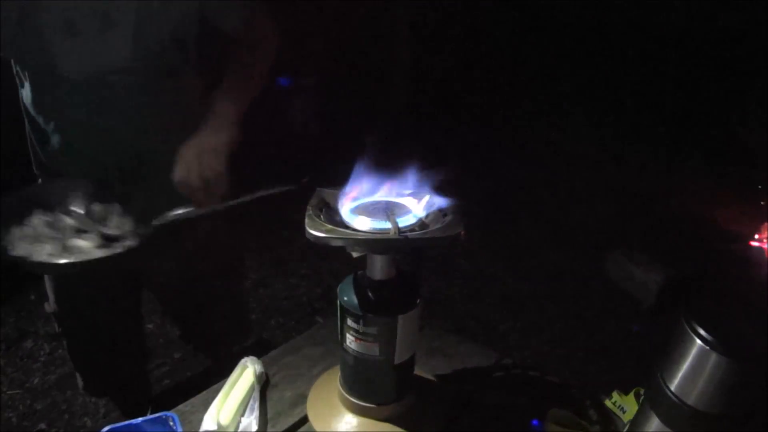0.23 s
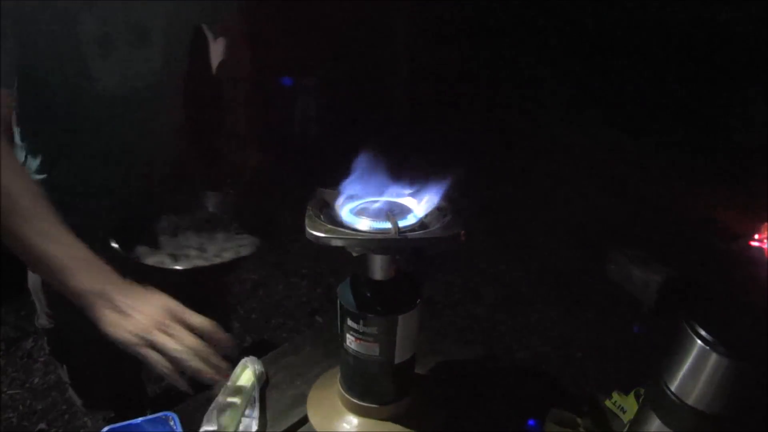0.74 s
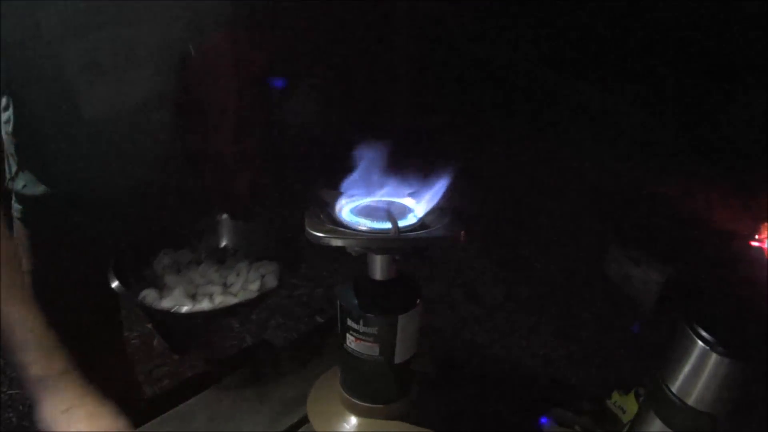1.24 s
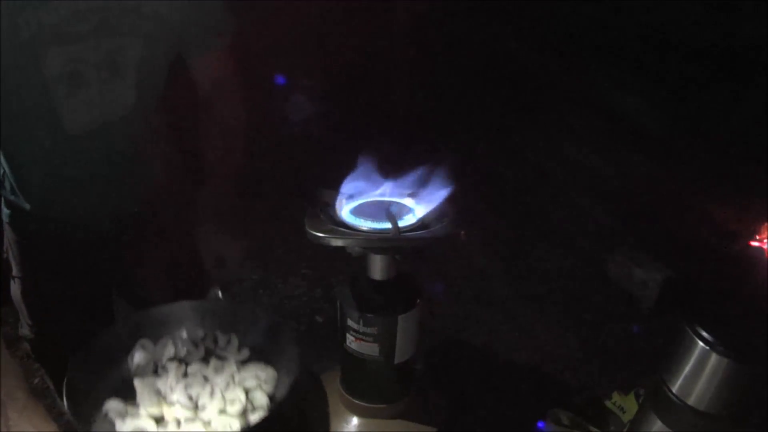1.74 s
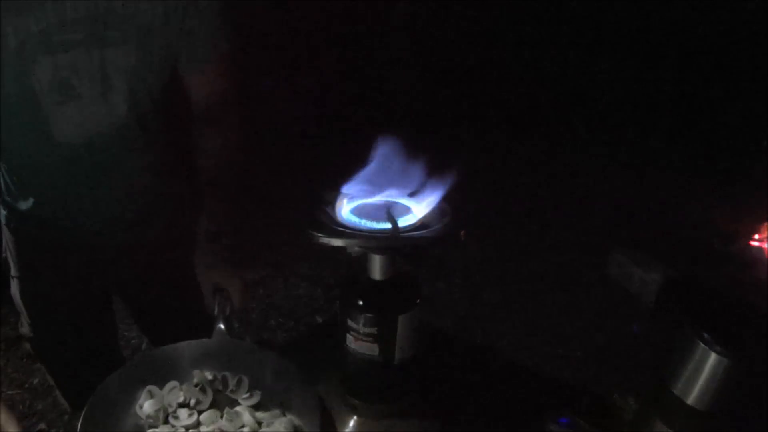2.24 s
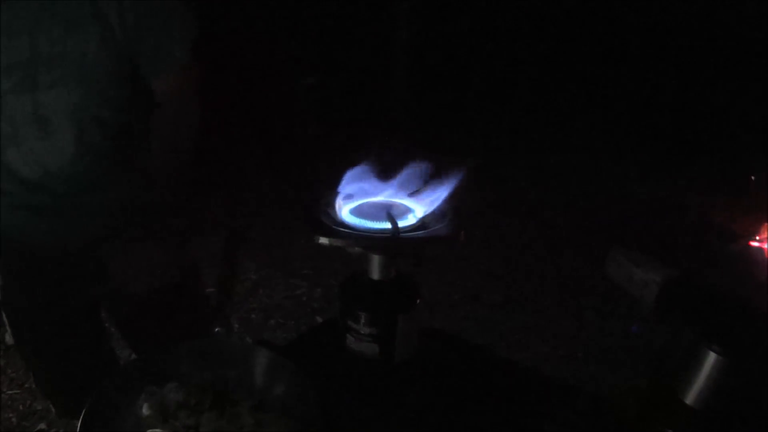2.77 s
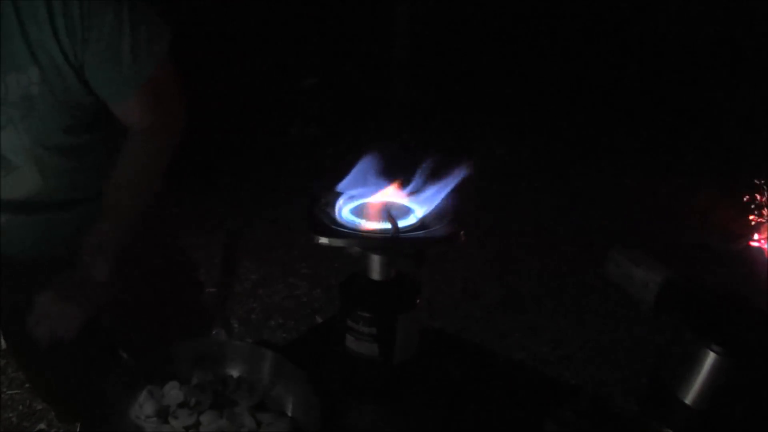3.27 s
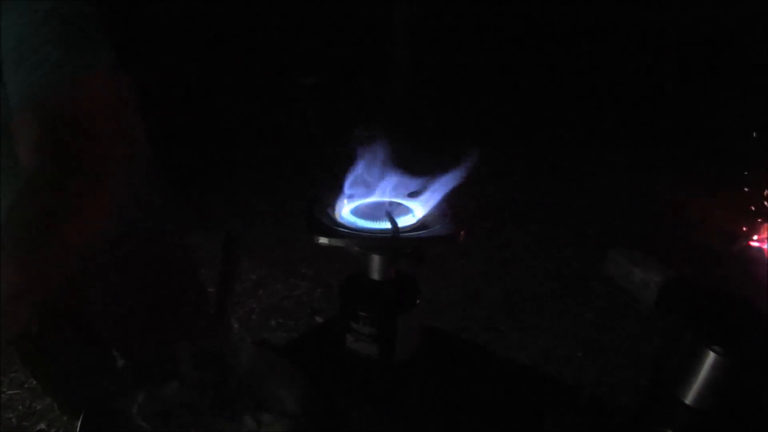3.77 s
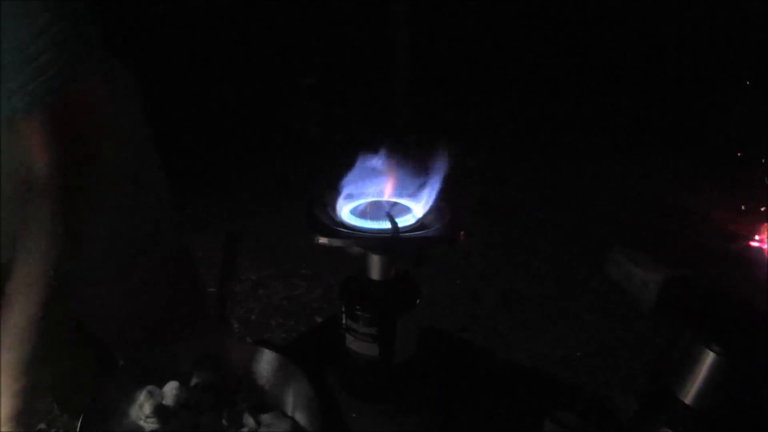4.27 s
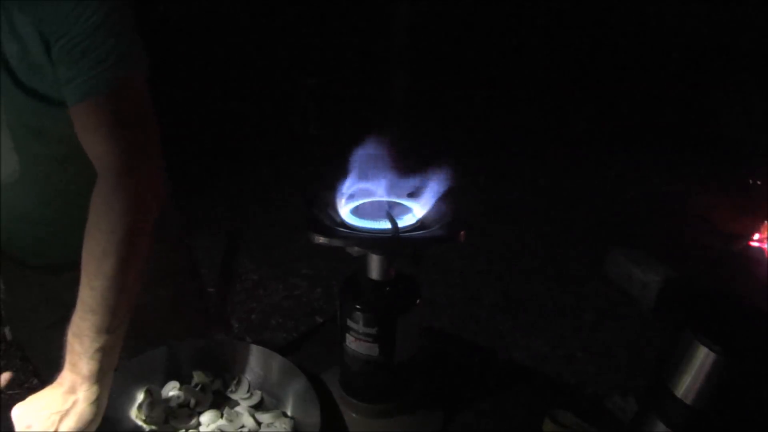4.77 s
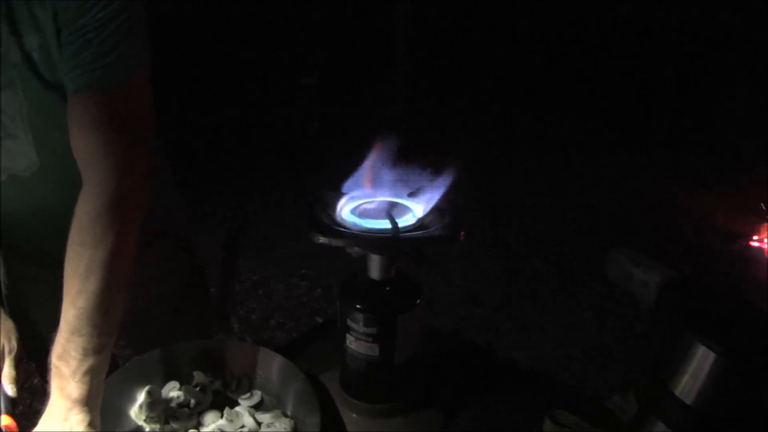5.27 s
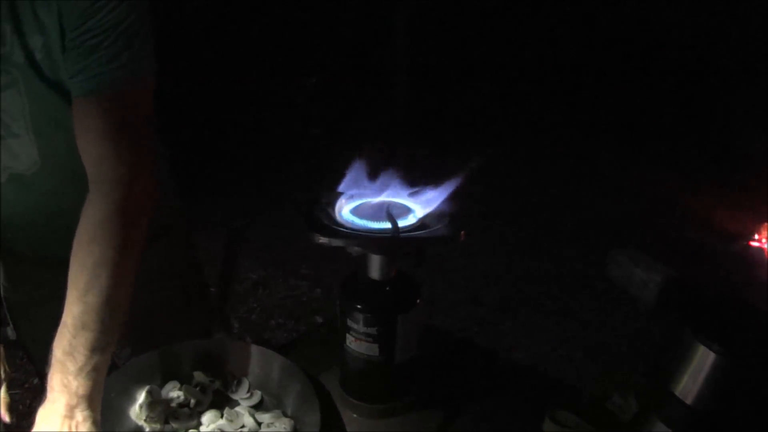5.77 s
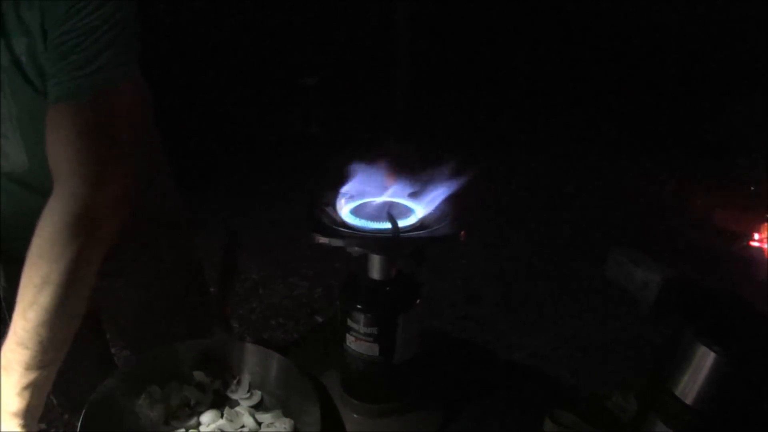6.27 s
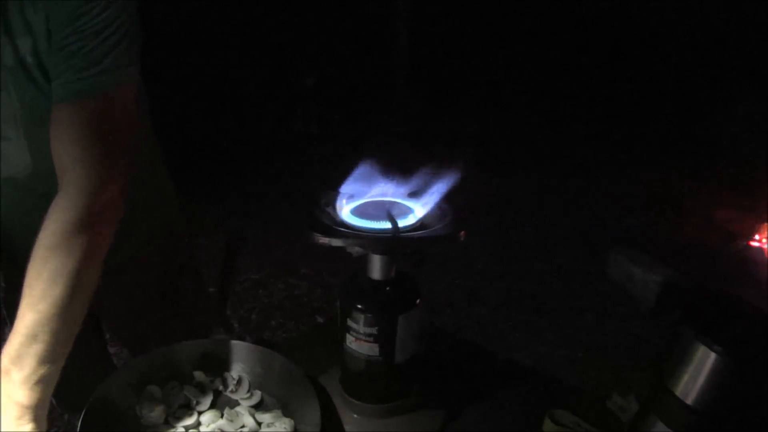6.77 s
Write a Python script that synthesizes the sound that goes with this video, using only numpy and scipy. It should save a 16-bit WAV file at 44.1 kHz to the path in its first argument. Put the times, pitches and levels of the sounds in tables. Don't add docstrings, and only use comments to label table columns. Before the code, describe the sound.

Constant bright burner hiss with low flame flutter outdoors, broken by crinkling wrapper, pan set-down clatter, utensil taps and sharp fire pops.

```python
import sys
import numpy as np
from scipy import signal
from scipy.fft import rfft, irfft
from scipy.io import wavfile
from scipy.ndimage import uniform_filter1d, minimum_filter1d

SR = 44100
rng = np.random.default_rng(int(sys.argv[2]) if len(sys.argv) > 2 else 0)


def unload_wav(signal):
    wavfile.write(
        sys.argv[1],
        SR,
        np.round(np.clip(np.atleast_2d(signal).T, -1, 1) * 32767).astype(np.int16),
    )


def attenuation_scalar(level_db):
    decades = np.asarray(level_db, float) / 20
    return 10 ** decades


N = 309141

# frequency in Hz, likeness from 0 to 1.
STOVE_LIKENESS = [(60, 0.8), (110, 1), (190, 0.87), (340, 0.85), (620, 0.63), (1110, 0.62), (1980, 0.78),
                  (3550, 0.95), (6350, 0.95), (11400, 0.84)]
# frequency in Hz, left minus right in dB.
STOVE_TILT = [(60, 1), (110, 1.5), (190, -0.5), (340, -0.5), (620, -3), (1110, -1.5), (1980, -1),
              (3550, -1.0), (6350, -1.5), (11400, -0.5)]
# start in seconds, peak in dB, centre in Hz, ring t60 in seconds,
# left minus right in dB.
EMBER_SNAPS = [
    (0.7574, -21, 7750, 0.006, -11),
    (0.9482, -11, 10600, 0.0055, 3),
    (0.9622, -19, 6350, 0.006, -1.0),
    (0.9941, -9, 6760, 0.0066, -0.5),
    (1.5994, -19, 7820, 0.006, -1.5),
    (1.9344, -24, 7850, 0.006, -1.5),
    (2.2383, -15, 5600, 0.0073, -0.5),
    (2.7816, -10, 9300, 0.0037, -13),
    (3.0994, -22, 7720, 0.006, 4),
    (4.141, -12, 6720, 0.0076, 5),
]
# start in seconds, peak in dB, body in Hz,
# ring t60 in seconds, left minus right in dB.
EMBER_POPS = [
    (0.758, -17, 1980, 0.016, -10),
    (0.94, -18.5, 437, 0.032, -8),
    (0.942, -16, 1110, .008, -1),
    (2.782, -4.5, 1040, 0.0074, -10),
    (2.785, -15, 1490, .015, -9),
    (4.141, -12, 1700, .008, 2),
    (6.1564, -3.5, 1030, 0.0066, -7),
    (6.1589, -13, 1190, 0.015, -2),
]
# frequency in Hz, level in dB per Hz.
WRAPPER_COLOUR = [(1470, -43), (2500, -9), (3130, 8), (4770, -13.5), (5240, -7), (6950, -7.5),
                  (10700, -14.5), (11200, -10), (14600, -44), (22000, -120)]
# peak time in seconds, peak in dB, swell in seconds,
# release in dB per second, body level in dB.
WRAPPER_GRIPS = [(0.905, -43, .015, 60, -6), (0.95, -28, .012, 95, -12), (1.056, -36, .02, 300, -6),
                 (1.148, -34.5, .04, 90, -12), (1.268, -35, .025, 400, -8), (1.296, -27.5, .012, 150, -13),
                 (1.4, -43, .03, 120, -6), (3.103, -31, .012, 800, -3), (3.8, -42, .06, 200, -4),
                 (5.218, -32, .045, 120, -4), (5.268, -34, .04, 400, -9)]
# frequency in Hz, level in dB, t60 in seconds.
TABLE_MODES = [(80.5, -1.5, 0.18), (116, -9, .15), (169, 1, 0.13), (250, -0.5, 0.15), (314, -0.5, 0.056),
               (450, 6.5, 0.043), (560, -2.5, 0.034), (703, -0.5, 0.078), (1033, -27, 0.054),
               (1430, -10, 0.15)]
# frequency in Hz, level in dB, t60 in seconds.
PAN_MODES = [(325, 0, 0.31), (420, -14, 0.11), (808, 2, 0.039), (1241, -4, 0.097), (1542, -2, 0.036),
             (1754, 2, 0.043), (2030, 6.5, 0.014), (2512, -3.5, 0.071), (2980, 3, 0.023), (3850, 1, 0.049)]
# start in seconds, blow in dB, favoured pitch in Hz,
# loss at the first bounce in dB, left minus right in dB.
TABLE_LANDINGS = [
    (2.019, -10, 680, .4, 3),
    (2.247, -17, 340, .7, 3),
    (3.101, -27, 750, .6, 1),
    (4.087, -19, 260, 1.3, 2),
]
# start in seconds, blow in dB, favoured pitch in Hz,
# loss at the first bounce in dB, left minus right in dB.
RIM_LANDINGS = [
    (2.239, -18.5, 2300, .5, .5),
    (3.0945, -17, 1900, 3.5, 3),
]
# start in seconds, blow in dB.
TABLE_THUDS = [
    (2.034, -14),
    (2.243, -24.5),
    (4.084, -23),
]
# start in seconds, blow in dB, favoured pitch in Hz, spread in octaves,
# ring length factor.
UTENSIL_ON_TABLE = [
    (2.063, -24, 650, .6, .5),
    (4.0815, -10, 587, .28, .4),
    (4.141, -19.5, 400, .4, 1.2),
    (4.247, -27, 300, .4, 1.2),
]
# start in seconds, blow in dB, favoured pitch in Hz, spread in octaves,
# ring length factor.
UTENSIL_ON_RIM = [
    (3.799, -22, 744, .3, .47),
    (3.826, -20, 1600, .15, 1),
    (4.242, -11, 1500, .75, .3),
    (4.2455, -13, 810, .25, 1.3),
    (2.0185, -21, 1300, .45, .5),
    (2.036, -25, 1400, .3, .9),
    (3.8165, -25, 800, .4, .45),
    (3.787, -24, 2900, .3, .5),
]
# blow in dB, favoured pitch in Hz,
# spread in octaves, ring length factor.
RIM_SLIPS = [
    (-20, 2600, .5, .4),
    (-19.5, 2500, .8, .5),
    (-14.5, 1780, .2, .7),
    (-20, 1650, .3, .6),
    (-18.5, 2400, .8, .3),
]
# frequency in Hz, level in dB per Hz.
FLAME_COLOUR = [(12, -52), (20, -59), (49, -40), (87, -6), (161, 2.5), (205, -1.5), (330, -1), (433, -12.5),
                (687, -9.5), (900, -26.5), (1170, -64), (1980, -120)]
# time in seconds, flame strength in dB.
FLAME_STRENGTH = [
    (0.0, -41),
    (0.43, -39),
    (3.57, -39),
    (4.08, -37),
    (4.26, -34),
    (4.53, -38),
    (4.78, -38),
    (5.17, -35),
    (5.35, -39),
    (7.01, -36),
]
# frequency in Hz, level in dB per Hz.
JET_COLOUR = [(300, -23), (700, -20.5), (1000, -22), (1450, -17.5), (2000, -14.5), (3000, -11.5),
              (4100, -14), (5400, -12), (6300, -18), (7000, -18.5), (8200, -29), (9600, -28.5),
              (10900, -29), (11300, -22)]
# frequency in Hz, width in Hz, level in dB.
TUBE_BANDS = [(4698, 510, 2), (5783, 266, -9.5), (6720, 340, -18), (7590, 270, -10.5), (7810, 413, -9),
              (9600, 280, -26)]
# frequency in Hz,
# width in Hz, depth in dB.
REFLECTION_NULLS = [(427, 34, 22), (900, 140, 0), (1623, 290, 7), (2250, 65, 2.5), (2700, 39, 9),
                    (3507, 350, 8), (4330, 120, 8), (5205, 90, 22), (7140, 350, 4)]


def evened(x):
    return x / np.sqrt(np.mean(x ** 2) + 1e-20)


def drift(shape, size):
    return evened(uniform_filter1d(rng.standard_normal(shape), size=size, axis=0))


def read(points, hz):
    f, value = np.transpose(points)
    return np.interp(np.log(hz + 1), np.log(f + 1), value)


def filtered(x, hz, kind):
    return signal.sosfilt(signal.butter(2, hz, kind, fs=SR, output="sos"), x)


def add(mix, s, sound, pan_db):
    part = mix[:, round(s * SR):][:, :np.shape(sound)[-1]]
    part += attenuation_scalar(np.array([[pan_db / 2], [-pan_db / 2]])) * sound[..., :part.shape[1]]


def echoes(x):
    t = np.arange(3000) / SR
    signs = rng.choice([-1., 1.], (2, len(t)))
    present = rng.random((2, len(t))) < 1500 / SR
    taps = signs * present * (t > .0015) * attenuation_scalar(-60 * t / 0.079)
    return signal.fftconvolve(x, taps / np.linalg.norm(taps[0]), axes=1)[:, :N]


def snap(db, hz, t60):
    t = np.arange(1500) / SR
    splinters = 0.79 * np.diff(rng.standard_normal(len(t) + 1)) * min(hz / 6000, 1)
    return attenuation_scalar(db - 60 * t / t60) * (np.sin(2 * np.pi * hz * t) + splinters)


def pop(db, hz, t60):
    t = np.arange(2500) / SR
    step = (1 - t / .00008) * np.exp(-t / .00008)
    swings = sum(level * np.sin(2 * np.pi * ratio * hz * t)
                 for ratio, level in ((1, 0.54), (1.9, 0.36), (2.8, 0.44)))
    splinters = 0.35 * uniform_filter1d(rng.standard_normal(len(t)), size=4)
    return attenuation_scalar(db) * (0.37 * step + attenuation_scalar(-60 * t / t60) * (swings + splinters))


def rustle(peak_s, peak_db, swell_s, release_db, body_db):
    crease_share, split_hz = .7, 5500
    t = np.arange(8192) / SR
    level_db = peak_db - np.maximum(18 * (1 - t / swell_s), release_db * (t - swell_s))
    clumps = attenuation_scalar(1.8 * drift(len(t), 300))
    strength = attenuation_scalar(2.9 * np.minimum(rng.exponential(1, len(t)), 3))
    happens = rng.random(len(t)) < 2500 / SR
    creases = evened(rng.standard_normal(len(t)) * strength * happens)
    brushing = rng.standard_normal(len(t))
    drive = clumps * (crease_share * creases + (1 - crease_share) * brushing)
    colour = attenuation_scalar(read(WRAPPER_COLOUR, np.fft.rfftfreq(len(t), 1 / SR)))
    sheet = evened(irfft(rfft(drive) * colour, len(t)))
    body = filtered(sheet, split_hz, "low")
    crisp = filtered(sheet, split_hz, "high")
    fade = signal.windows.tukey(len(t), .05)
    return peak_s - swell_s, attenuation_scalar(level_db + 12.0) * (crisp + attenuation_scalar(body_db) * body) * fade


def knock(modes, db, favoured_hz, spread, ring):
    def bell(hz):
        return np.exp(-.5 * (np.log2((hz + 1) / favoured_hz) / spread) ** 2)
    t = np.arange(8192) / SR
    f, mode_db, t60 = np.transpose(modes)[:, :, None]
    size, detune, lag, start = rng.standard_normal((len(modes), 4)).T[:, :, None]
    ears = np.array([-.5, .5])[:, None, None]
    phase = .4 * start + .9 * lag * ears
    swing = np.sin(2 * np.pi * f * (1 + .015 * detune) * t + phase)
    decay = attenuation_scalar(mode_db + size - 60 * t / (t60 * ring))
    tones = (bell(f) * decay * swing).sum(1)
    grit = rng.standard_normal((3, len(t)))
    grit = grit[0] + .5 * grit[1:]
    grit = irfft(rfft(grit) * bell(np.fft.rfftfreq(len(t), 1 / SR)), len(t))
    scuff = .5 * evened(grit) * attenuation_scalar(-60 * t / (.05 * ring))
    onset = np.minimum(t * favoured_hz * 1.86, 1)
    return attenuation_scalar(db) * (tones + scuff) * onset


def land(landings, modes, gap_s, kept, spread, ring, rock_db):
    hits = []
    for s, db, hz, loss_db, pan_db in landings:
        for k in range(5):
            sound = knock(modes, db - loss_db * k ** 2, hz * kept ** k, spread, ring)
            hits.append((s + k * gap_s, sound, pan_db + rock_db * (-1) ** k))
    return hits


def drag():
    start_s, gap_s, catch_lead_s, pan_db = 3.7565, .02, .005, 4
    hits = []
    for k, slip in enumerate(RIM_SLIPS):
        s = start_s + k * gap_s
        hits.append((s, knock(PAN_MODES, *slip), pan_db))
        catch = knock(PAN_MODES, db=-28, favoured_hz=2800, spread=.4, ring=.45)
        hits.append((s - catch_lead_s, catch, pan_db))
    return hits


def contacts():
    hits = land(TABLE_LANDINGS, TABLE_MODES, gap_s=.0105, kept=.8, spread=.8, ring=.55, rock_db=-7)
    hits += land(RIM_LANDINGS, PAN_MODES, gap_s=.0078, kept=.82, spread=1.0, ring=.65, rock_db=1)
    for s, db in TABLE_THUDS:
        hits.append((s, knock(TABLE_MODES, db, favoured_hz=135, spread=.55, ring=.85), 0))
    for modes, taps in ((TABLE_MODES, UTENSIL_ON_TABLE), (PAN_MODES, UTENSIL_ON_RIM)):
        for s, *blow in taps:
            hits.append((s, knock(modes, *blow), 3))
    return hits + drag()


def turbulence(gain_at, patchy_db, flicker_db, swell_db, size):
    frames, hz = 4 * N // size + 5, np.fft.rfftfreq(size, 1 / SR)
    a, b, c, d, patches = rng.standard_normal((frames, len(hz), 5)).T
    patches = uniform_filter1d(patches, size=8, axis=0)
    patches = evened(uniform_filter1d(patches, size=10, axis=1))
    patch_depth = patchy_db * (1 + 1.4 * (hz > 8200))[:, None]
    flicker = drift(frames, 3)
    swell = drift(frames, frames // 30)
    same = np.clip(read(STOVE_LIKENESS, hz), -1, 1)[:, None]
    left = a + 1j * b
    right = same * left + np.sqrt(1 - same ** 2) * (c + 1j * d)
    tilt_db = np.array([.5, -.5])[:, None] * read(STOVE_TILT, hz)
    z = np.array([left, right]) * attenuation_scalar(tilt_db)[:, :, None]
    z *= gain_at(hz)[:, None] * attenuation_scalar(patch_depth * patches + flicker_db * flicker + swell_db * swell)
    return evened(signal.istft(z, nperseg=size, noverlap=3 * size // 4)[1][:, :N])


def flame():
    def colour(hz):
        return attenuation_scalar(read(FLAME_COLOUR, hz))
    s, strength_db = np.transpose(FLAME_STRENGTH)
    flutter = turbulence(colour, patchy_db=1.5, flicker_db=2.0, swell_db=0.67, size=2048)
    return attenuation_scalar(np.interp(np.arange(N) / SR, s, strength_db) + 3.2) * flutter


def jet():
    def colour(hz):
        bands = sum(attenuation_scalar(2 * db) / (1 + (2 * (hz - f) / width) ** 2) ** 3 for f, width, db in TUBE_BANDS)
        cut_db = sum(db * np.exp(-(2 * (hz - f) / width) ** 2) for f, width, db in REFLECTION_NULLS)
        return np.sqrt(attenuation_scalar(2 * read(JET_COLOUR, hz)) + bands) / attenuation_scalar(cut_db)
    return attenuation_scalar(-22) * turbulence(colour, patchy_db=1.0, flicker_db=.5, swell_db=0.28, size=1024)


def scene():
    stove = attenuation_scalar(-0.72) * (jet() + flame())
    handling = np.zeros((2, N))
    for grip in WRAPPER_GRIPS:
        add(handling, *rustle(*grip), pan_db=1.5)
    for burst, events in ((snap, EMBER_SNAPS), (pop, EMBER_POPS)):
        for s, db, hz, t60, pan_db in events:
            add(handling, s, burst(db, hz, t60), pan_db)
    for hit in contacts():
        add(handling, *hit)
    handling = filtered(handling, 65, "high")
    return stove + handling + attenuation_scalar(-8) * echoes(handling)


def top_cut(x):
    return signal.sosfilt(signal.butter(12, 11980, fs=SR, output="sos"), x)


def record(dry):
    peak = -minimum_filter1d(-abs(dry).max(0), size=161)
    peak_db = 20 * np.log10(peak + 1e-9)
    fall = np.arange(N) * 250.0 / SR
    held_db = np.maximum.accumulate(peak_db + fall) - fall
    over_db = np.maximum(held_db + 5.5, 0)
    ducked = dry / attenuation_scalar(.5 * uniform_filter1d(over_db, size=60))
    edge = signal.firwin(1501, 11020, window=("kaiser", 8), fs=SR)
    mix = signal.oaconvolve(ducked, edge[None], "same")
    return top_cut(mix)


dry = scene()
out = record(dry)
unload_wav(out)
```